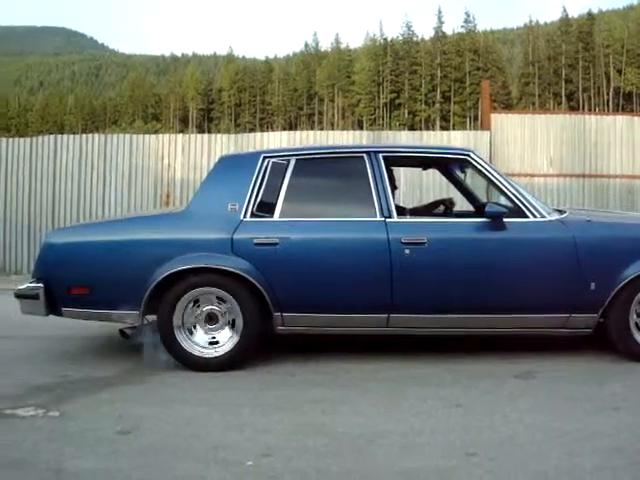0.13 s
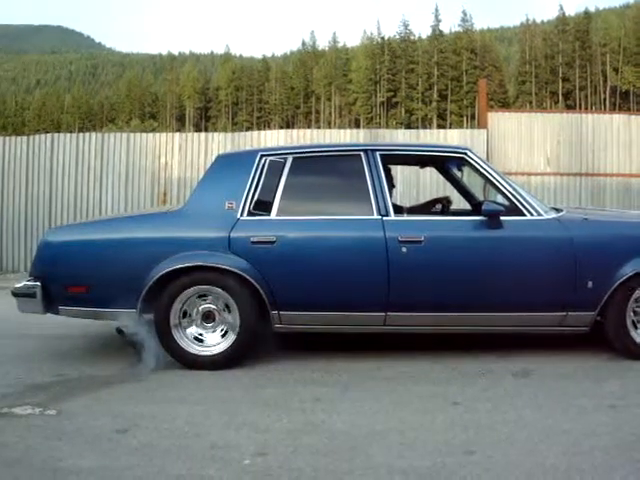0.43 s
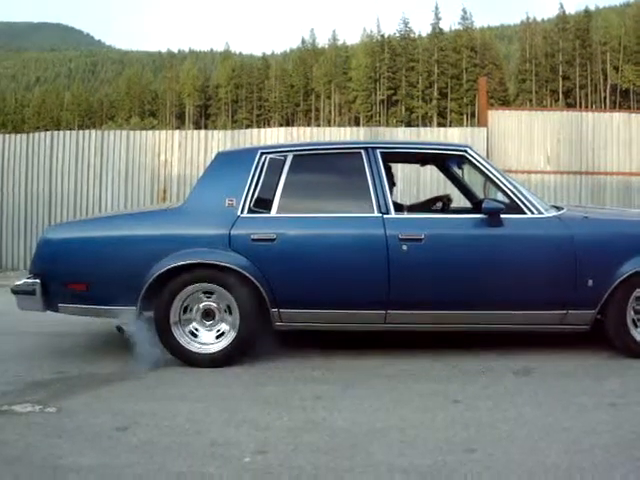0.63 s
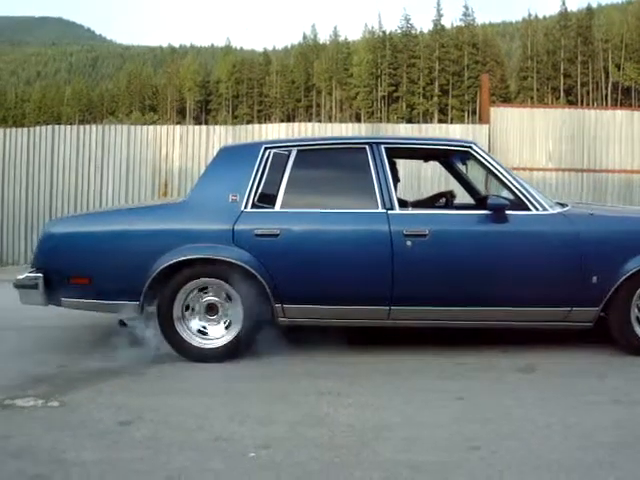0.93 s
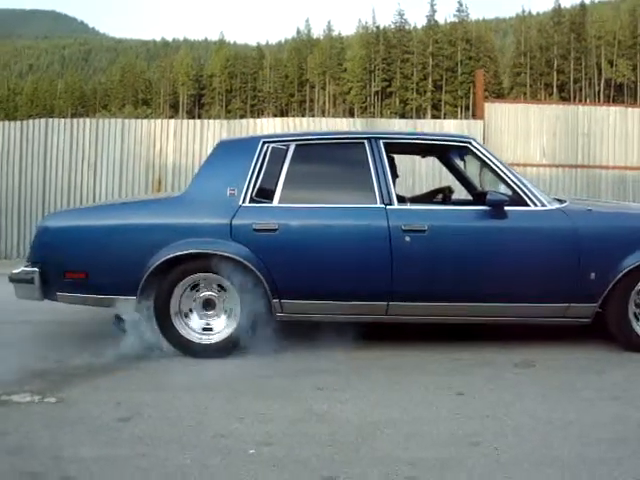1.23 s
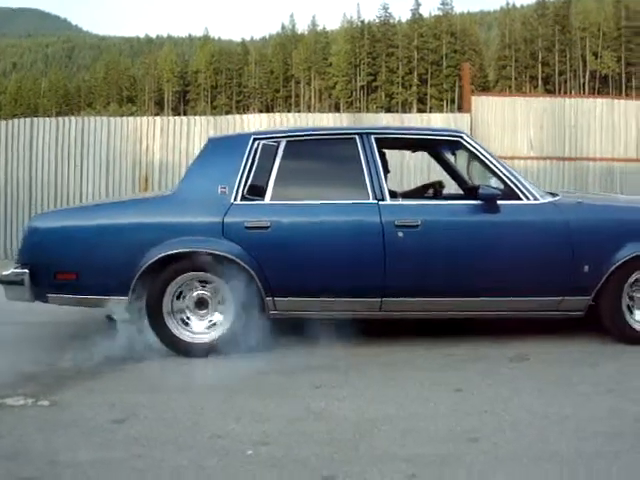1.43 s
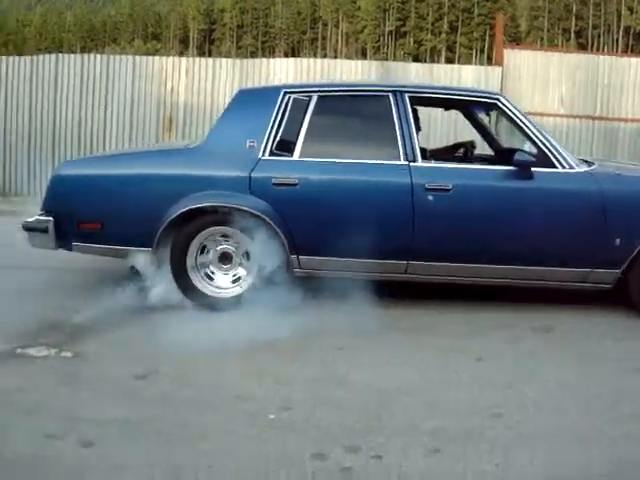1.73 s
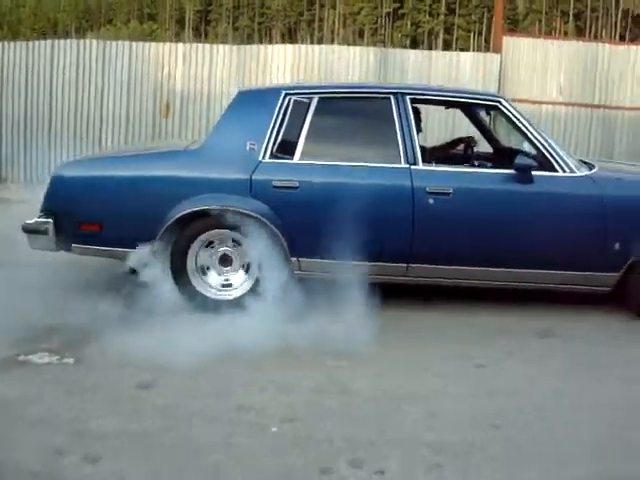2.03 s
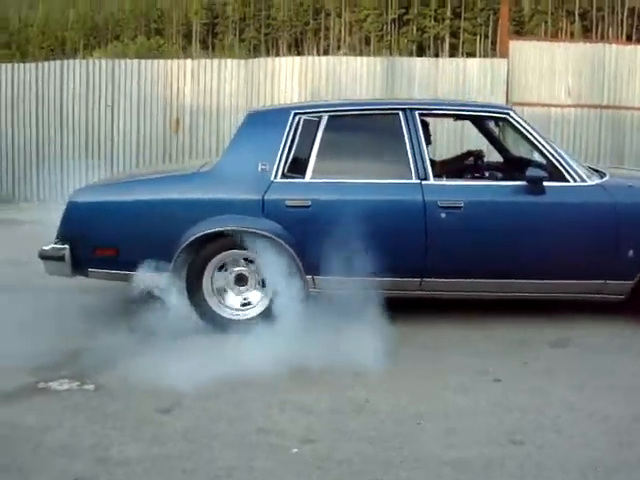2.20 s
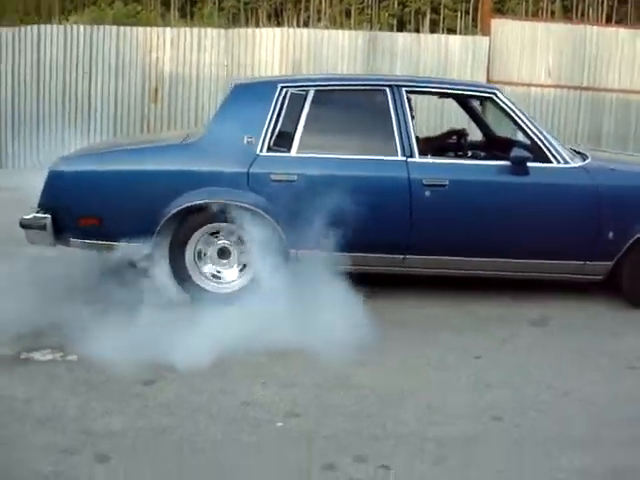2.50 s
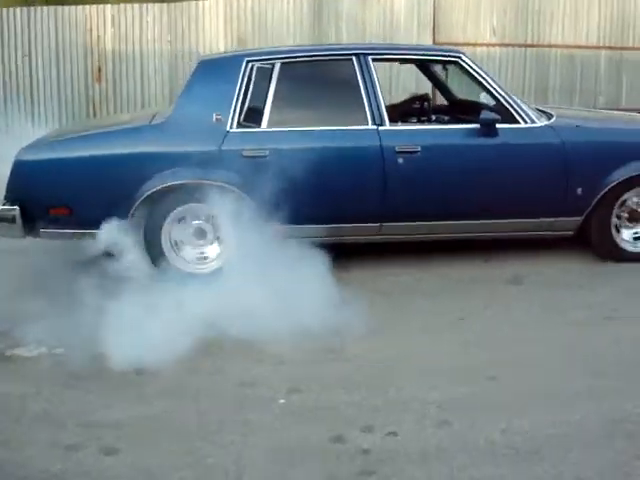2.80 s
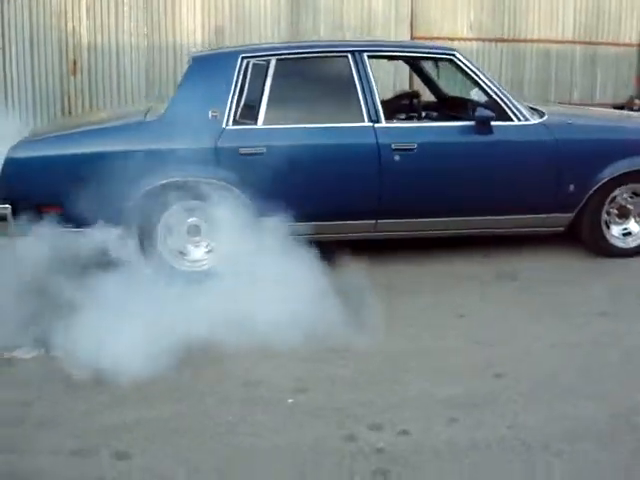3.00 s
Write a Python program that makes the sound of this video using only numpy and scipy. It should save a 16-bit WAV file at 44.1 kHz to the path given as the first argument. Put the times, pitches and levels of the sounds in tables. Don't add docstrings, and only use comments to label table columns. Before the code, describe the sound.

Loud uneven V8 exhaust roar climbs, holds high, then dips as a spinning tyre scrubs pavement.

```python
import sys
import numpy as np
from scipy import signal
from scipy.fft import rfft, irfft
from scipy.io import wavfile

SR = 44100
rng = np.random.default_rng(int(sys.argv[2]) if len(sys.argv) > 2 else 0)


def undo_db(level):
    steps = np.asarray(level, float) / 20
    return 10 ** steps


def master(y):
    cut = np.clip(np.atleast_2d(y).T, -1, 1)
    pcm = np.round(cut * 32767)
    wavfile.write(sys.argv[1], SR, pcm.astype(np.int16))


N = 138915

# time_s, speed_rpm
CRANK_SPEED = [(0.0, 2739.6), (0.3, 3131.1), (0.6, 3529.6), (0.8, 3669.4), (1.0, 3830.7), (1.2, 4100.6),
               (1.4, 4322.5), (1.6, 4483.7), (1.8, 4622.5), (2.1, 4736.2), (2.4, 4770.1), (2.5, 4754.6),
               (2.6, 4595.4), (2.7, 4300.5), (2.8, 4042.6), (2.9, 4047.7), (3.15, 4005.0)]
START_CYCLE = -.267
# time_s, thump_db, crack_db, ring_db, roar_db
SOURCE_LEVELS = [(0, -20.5, -41.5, -47, -17.5), (.35, -24.5, -36, -53, -15.5), (.7, -25, -26, -50, -18.5),
                 (1.0, -24.5, -23.5, -28, -19.5), (1.3, -24.5, -25.5, -41.5, -23),
                 (1.65, -26, -29.5, -26, -26.5), (2.0, -24.5, -36, -23, -29),
                 (2.45, -23.5, -31, -23, -22.5), (2.65, -21.5, -30, -25, -27.5),
                 (2.85, -24, -27.5, -25.5, -25), (3.15, -22, -17, -33, -23.5)]

MIC_LOW_HZ, RUMBLE_DB = 139.3, -51.5

# delay_s, level_db
FENCE_ECHOES = [
    (0.01, -23),
    (.019, -25.5),
    (.034, -18.5),
]
# time_s, lag_ms, level_db
GROUND_ECHO = [(0, 0.29, -9.5), (.7, 0.32, -18), (1.4, .29, -13), (1.8, 0.32, -14.5), (2.1, 0.36, -13.5),
               (2.7, .39, -10.5), (3.15, 0.41, -12.5)]
SHADOW_HZ, SHADOW_WIDTH_HZ, SHADOW_SHARE = 820, 110, 0.56

# centre_hz, width_hz, level_db
CARCASS_MODES = [(444, 49, -15.5), (642.4, 19, -5), (750, 167, -6), (906, 141, -1.5), (1114, 81, -1),
                 (1860, 1320, -11.5)]
# centre_hz, width_hz, level_db
SQUEAL_MODES = [(1114, 75, -13), (1180, 120, -14)]
SQUEAL_DB, BITE_S, BITE_RISE_S = -19.5, 2.36, 0.97
# freq_hz, density_db_per_hz
HISS_SPECTRUM = [(600, -24), (1080, -4.5), (1400, -10.5), (2550, -5.5), (4000, -11), (4900, -12),
                 (5900, -14), (9950, -26)]
HISS_DB, HISS_RISE_DB_PER_S, HISS_SPLIT_HZ = -25, .5, 5600

DRONE_ORDER, DRONE_PLACE_EIGHTHS = 5, 1.5
DRONE_DB, DRONE_FADES_RPM, DRONE_GONE_RPM = -38, 4010, 4130
# order_per_cycle, peak_s, half_length_s, level_db
SINGING_ORDERS = [(12, .1, 0.22, -38), (13, .15, .4, -38), (17, 0.38, 0.17, -26.5), (11, 0.53, 0.55, -35.5),
                  (8, 0.7, 0.27, -42.5), (6, 0.84, 0.8, -42.5), (19, 0.94, 0.41, -35.5),
                  (20, 0.95, 0.34, -29.5), (14, 1.05, 0.39, -27), (9, 1.1, 0.81, -34.5),
                  (10, 1.24, 0.55, -40.5), (24, 1.1, 0.38, -29), (23, 1.6, 0.42, -26), (31, 1.9, .45, -30),
                  (32, 1.77, 0.23, -34.5), (18, 1.94, .9, -39), (19, 2.1, 0.2, -30.5),
                  (14, 2.89, 0.42, -27), (20, 3.08, .35, -32), (19, 3.0, 0.27, -35), (23, 3.0, .25, -30),
                  (33, 3.0, 0.32, -37)]

FIRING_PLACES = [0.352, 1.51, 2.6, 3.45, 4.71, 5.4, 6.49, 7.5]
STAGE_S = [
    .35,
    1.1,
    1.6,
    2.5,
    2.8,
]
# pull_away_db, climb_db, full_revs_db, eased_off_db
CYLINDER_THUMPS = [(-7, -20, -0.5, -7), (-1, 5.5, 6, 1), (-8.5, 1, -5, -5), (-17, -19, -0.5, -8),
                   (6.5, 4.5, 5.5, 1), (-7, -16.5, -12.5, 5), (0, 6, 5, 5.5), (4, 1.5, -11.5, 1)]
# pull_away_db, climb_db, full_revs_db, eased_off_db
CYLINDER_CRACKS = [(-15, -21.5, -16.5, -13), (-3.5, -7.5, -6, -9), (-13, -25, -27, -18),
                   (-29.5, -32, -14, -19.5), (-4.5, -4, -4, -5.5), (-8, -6.5, -24, -20),
                   (-6, -13, 0.5, -16), (-20, -5, -11.5, -14)]
CYLINDER_KNOCKS = [-16, 0, -3, -12, -6, -5, -14, -16]

# freq_hz, density_db_per_hz
THUMP_SPECTRUM = [(130, -10.5), (200, -6), (310, -4), (410, 0), (495, 1), (700, 0), (1150, -5), (2600, -31)]
# centre_hz, width_hz, gain_db
PIPE_MODES = [(274, 45, -4), (319.5, 24, 1), (436, 80, -7.5), (459, 84, 6), (585, 86, 0.5), (659, 42, 3),
              (847, 140, 3), (1215, 59, 5), (1580, 250, -0.5)]
# centre_hz, width_hz, level_db
CRACK_MODES = [(1715, 300, -6), (2700, 260, -1), (3620, 220, 2), (4200, 350, -3), (5300, 2400, -12.5)]
# centre_hz, width_hz, level_db
TIP_MODES = [(2200, 110, 0), (2290, 90, 0), (2380, 110, -2), (2500, 100, -1), (2780, 160, -4),
             (3270, 140, -7), (1640, 220, -6)]
CRACK_LEAD_S, PIPE_RETURN_S, PIPE_RETURN_DB = 0.001051, .0026, -6.5
BLAST_DB, BLAST_S, RING_BLAST_DB = -7, 0.0015, -3
PUFF_DB, PUFF_S = -30.5, 0.0026
BURBLE_DB, BURBLE_FADE_DB_PER_S = -35.5, 8.5


def rms_one(x):
    return x / np.sqrt(np.mean(x ** 2) + 1e-20)


def noise():
    return rng.standard_normal(N)


def band(x, order, edge_hz, kind):
    return signal.sosfilt(signal.butter(order, edge_hz, kind, fs=SR, output="sos"), x)


def in_time(rows):
    s, *columns = np.transpose(rows)
    return [np.interp(np.arange(N) / SR, s, c) for c in columns]


def later(x, delay_s):
    return np.interp(np.arange(N) - delay_s * SR, np.arange(N), x, left=0)


def drift(rate_hz):
    r = np.exp(-40 * np.pi * rate_hz / SR)
    slow = signal.lfilter([1], [1, -2 * r, r * r], rng.standard_normal(N // 20 + 2002))[2000:]
    return np.interp(np.arange(N) / 20, np.arange(len(slow)), rms_one(slow))


def resonate(x, modes, low_hz, high_hz, flicker_db=0.0):
    out = 0
    for k, (hz, width_hz, db) in enumerate(modes):
        r = np.exp(-np.pi * width_hz / SR)
        zeros = [(1 - r * r) / 2, 0, (r * r - 1) / 2]
        poles = [1, -2 * r * np.cos(2 * np.pi * hz / SR), r * r]
        y = signal.lfilter(zeros, poles, x + 1e-18)
        out = out + (-1) ** k * undo_db(db + flicker_db * drift(5.4)) * y
    return rms_one(band(out, 2, [low_hz, high_hz], "band"))


def colour(x, spectrum):
    hz = np.fft.rfftfreq(N, 1 / SR) + 1
    point_hz, point_db = np.transpose(spectrum)
    gain = undo_db(np.interp(np.log(hz), np.log(point_hz), point_db))
    gain = gain / (1 + (point_hz[0] / hz) ** 4)
    return rms_one(irfft(rfft(x) * gain, N))


def crank():
    rpm, = in_time(CRANK_SPEED)
    return rpm, START_CYCLE + np.cumsum(rpm) / (120 * SR)


def rumble():
    return undo_db(RUMBLE_DB) * rms_one(band(noise(), 1, [60, 400], "band"))


def fence(car):
    dull = signal.lfilter([.4], [1, -.6], car)
    return sum(undo_db(db) * later(dull, delay_s) for delay_s, db in FENCE_ECHOES)


def ground(car):
    lag_ms, level_db = in_time(GROUND_ECHO)
    return undo_db(level_db) * later(car, lag_ms / 1000)


def body_shadow(car, bite):
    peak = signal.iirpeak(SHADOW_HZ, SHADOW_HZ / SHADOW_WIDTH_HZ, fs=SR)
    middle = signal.filtfilt(*peak, car)
    return car - SHADOW_SHARE * np.minimum(2 * bite, 1) * middle


def scrub_hiss():
    low = band(noise() * undo_db(2.68 * drift(180)), 4, HISS_SPLIT_HZ, "low")
    high = band(noise() * undo_db(2.68 * drift(180)), 4, HISS_SPLIT_HZ, "high")
    level_db = HISS_DB + HISS_RISE_DB_PER_S * np.arange(N) / SR
    return undo_db(level_db) * colour(low + high, HISS_SPECTRUM)


def tyre(roar_db, bite):
    grains = noise() * undo_db(0.55 * drift(62))
    roar = resonate(grains, CARCASS_MODES, low_hz=463, high_hz=2530, flicker_db=0.5)
    squeal = resonate(noise(), SQUEAL_MODES, low_hz=930, high_hz=1230, flicker_db=-4.5)
    return undo_db(roar_db) * roar + undo_db(SQUEAL_DB) * bite * squeal + scrub_hiss()


def drone():
    rpm, cycle = crank()
    cycle = cycle - DRONE_PLACE_EIGHTHS / 8
    share = np.clip((DRONE_GONE_RPM - rpm) / (DRONE_GONE_RPM - DRONE_FADES_RPM), 0, 1)
    out = undo_db(DRONE_DB) * share * np.cos(2 * np.pi * DRONE_ORDER * cycle)
    for order, peak_s, half_s, db in SINGING_ORDERS:
        swell = np.cos(np.pi / 2 * np.clip((np.arange(N) / SR - peak_s) / half_s, -1, 1))
        out = out + undo_db(db + 1.55 * drift(4.5)) * swell * np.cos(2 * np.pi * round(order) * cycle)
    return out


def click_train(at, db):
    train, i, size = np.zeros(N), at.astype(int), undo_db(db)
    np.add.at(train, i, size * (1 - at + i))
    np.add.at(train, i + 1, size * (at - i))
    return train


def firings(jitter_s, thump_spread_db, crack_spread_db):
    _, cycle = crank()
    cycles = 110
    turn = (np.arange(-1, cycles - 1)[:, None] + np.array(FIRING_PLACES) / 8).ravel()
    luck = rng.standard_normal((len(turn), 3))
    at = np.interp(turn, cycle, np.arange(N), left=-9, right=-9) + jitter_s * SR * luck[:, 0]
    heard = (at > 0) & (at < N - 2)

    stage_weights = np.eye(4)[:, [0, 1, 2, 2, 3]]
    shares = np.array([np.interp(at / SR, STAGE_S, row) for row in stage_weights]).T
    thump_db = (np.tile(CYLINDER_THUMPS, (cycles, 1)) * shares).sum(axis=1)
    crack_db = (np.tile(CYLINDER_CRACKS, (cycles, 1)) * shares).sum(axis=1)
    knock_db = np.tile(CYLINDER_KNOCKS, cycles)

    thump_db = thump_db + thump_spread_db * luck[:, 1]
    crack_db = crack_db + crack_spread_db * luck[:, 2]
    knock_db = knock_db + crack_spread_db * luck[:, 2]
    return [click_train(at[heard], db[heard]) for db in (thump_db, crack_db, knock_db)]


def gas_burst(clicks, decay_s):
    gate = signal.lfilter([1], [1, -np.exp(-1 / (decay_s * SR))], clicks)
    return rms_one(gate * noise())


def standing(x):
    for hz, width_hz, db in PIPE_MODES:
        a, w = undo_db(db / 2), 2 * np.pi * hz / SR
        q = np.pi * width_hz / SR
        zeros = [1 + q * a, -2 * np.cos(w), 1 - q * a]
        poles = [1 + q / a, -2 * np.cos(w), 1 - q / a]
        x = signal.lfilter(zeros, poles, x)
    return rms_one(x)


def burble():
    level_db = BURBLE_DB - BURBLE_FADE_DB_PER_S * np.arange(N) / SR
    return undo_db(level_db) * resonate(noise(), [(330, 370, 0)], low_hz=200, high_hz=520)


def pipe_ring(knocks):
    twice = knocks + undo_db(PIPE_RETURN_DB) * later(knocks, PIPE_RETURN_S)
    drive = rms_one(twice) + undo_db(BLAST_DB + RING_BLAST_DB) * gas_burst(knocks, BLAST_S)
    return resonate(drive, TIP_MODES, low_hz=1540, high_hz=3600, flicker_db=1.3)


def exhaust(thump_db, crack_db, ring_db):
    thumps, cracks, knocks = firings(jitter_s=.00002, thump_spread_db=1.3, crack_spread_db=1.3)
    cracks, knocks = later(cracks, -CRACK_LEAD_S), later(knocks, -CRACK_LEAD_S)
    thump = standing(colour(thumps, THUMP_SPECTRUM))
    crack_drive = rms_one(cracks) + undo_db(BLAST_DB) * gas_burst(cracks, BLAST_S)
    crack = resonate(crack_drive, CRACK_MODES, low_hz=1440, high_hz=5930)
    puff = undo_db(PUFF_DB) * colour(gas_burst(cracks, PUFF_S), HISS_SPECTRUM)
    tonal = undo_db(thump_db) * thump + undo_db(crack_db) * crack + undo_db(ring_db) * pipe_ring(knocks)
    return tonal + puff + burble()


def scene():
    thump_db, crack_db, ring_db, roar_db = in_time(SOURCE_LEVELS)
    bite = np.clip((np.arange(N) / SR - BITE_S) / BITE_RISE_S, 0, 1)
    car = exhaust(thump_db, crack_db, ring_db) + drone() + tyre(roar_db, bite)
    car = body_shadow(car, bite)
    car = car + ground(car)
    return (car + fence(car))[None]


def band_limit(x):
    return signal.sosfilt(signal.butter(12, 10100, fs=SR, output="sos"), x)


def record(dry):
    rounded = 0.78 * np.tanh(dry / 0.8)
    thin = band(rounded, 6, MIC_LOW_HZ, "high")
    return band_limit(thin + rumble())


dry = scene()
out = record(dry)
master(out)
```